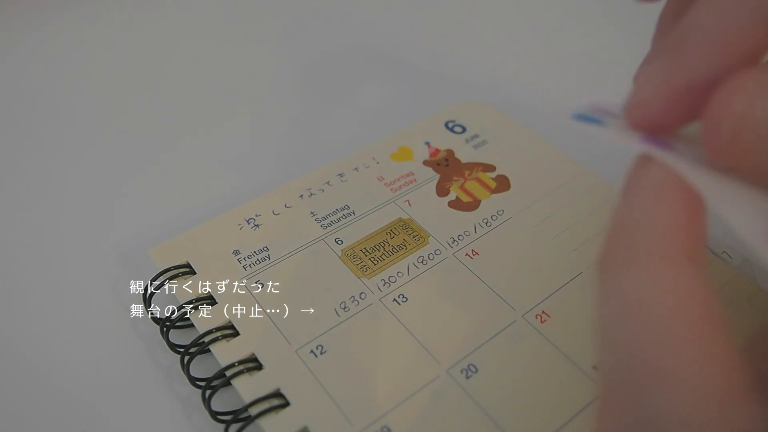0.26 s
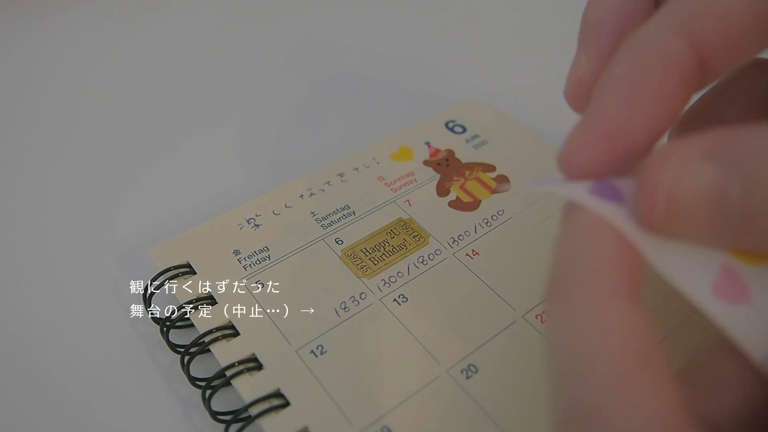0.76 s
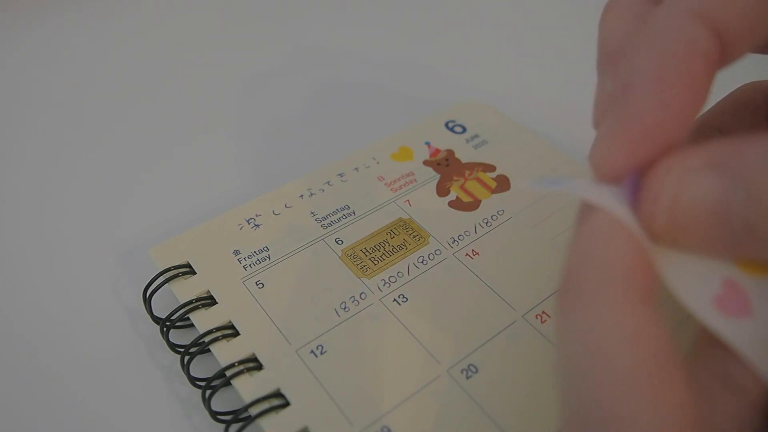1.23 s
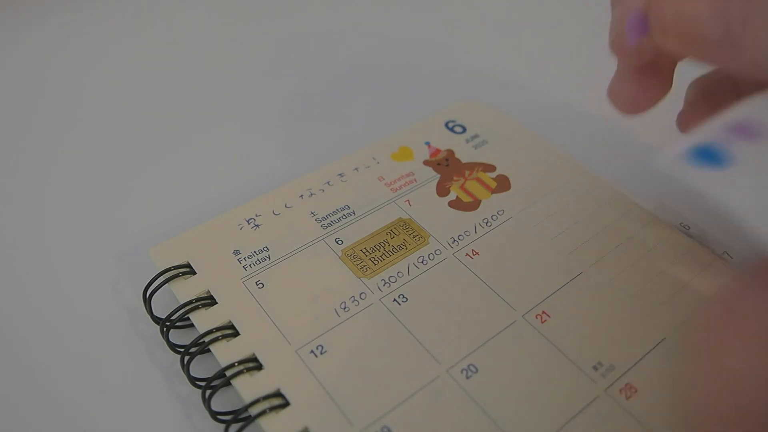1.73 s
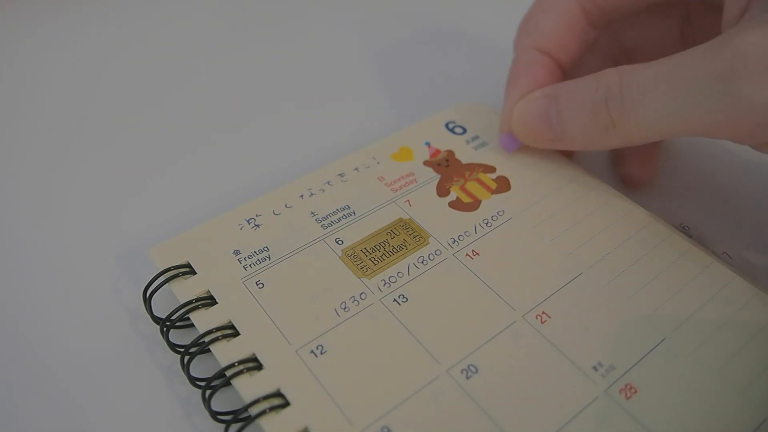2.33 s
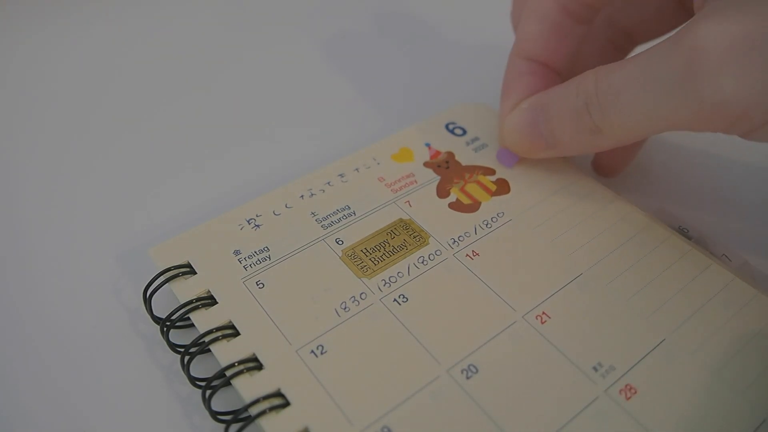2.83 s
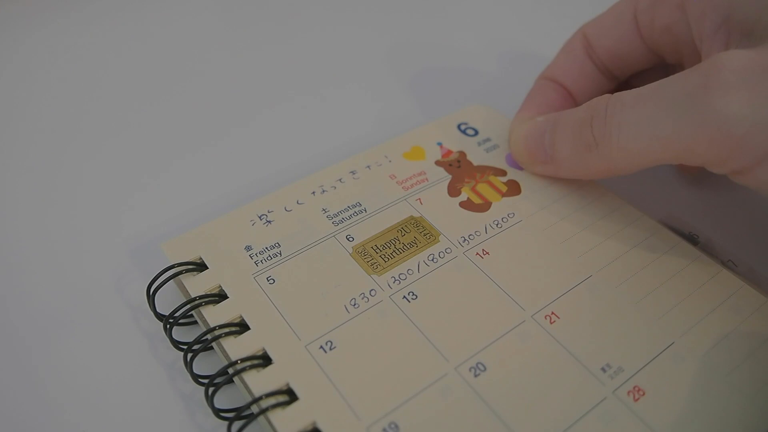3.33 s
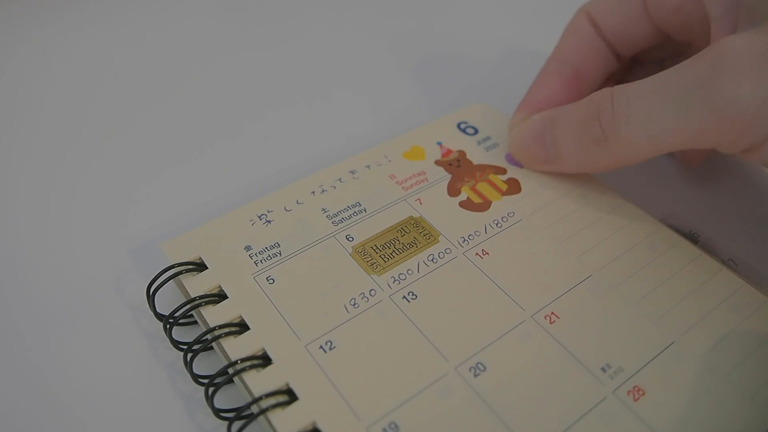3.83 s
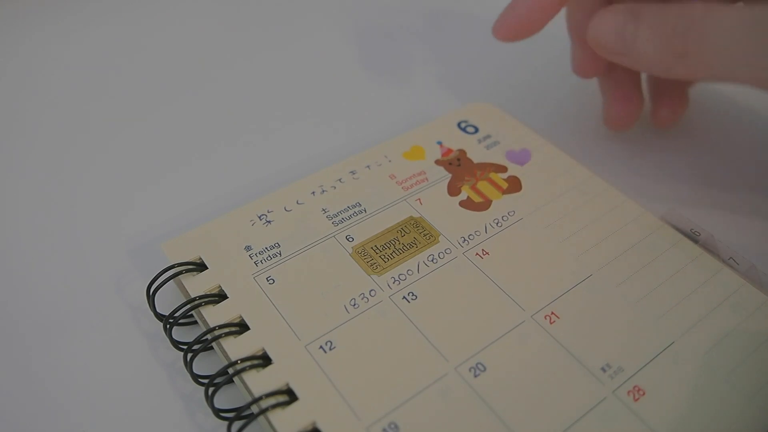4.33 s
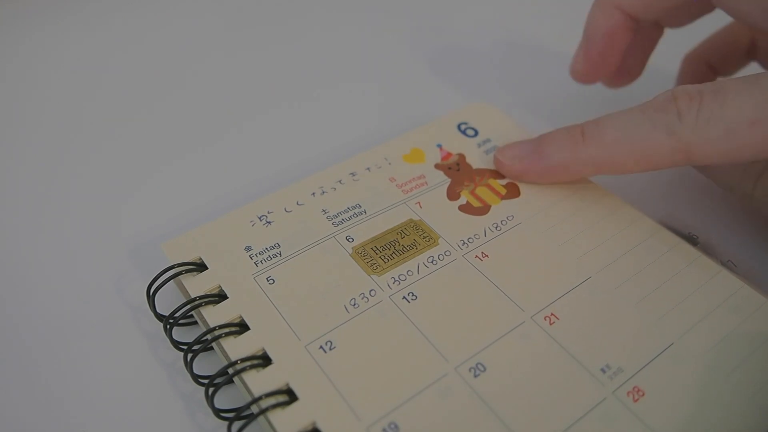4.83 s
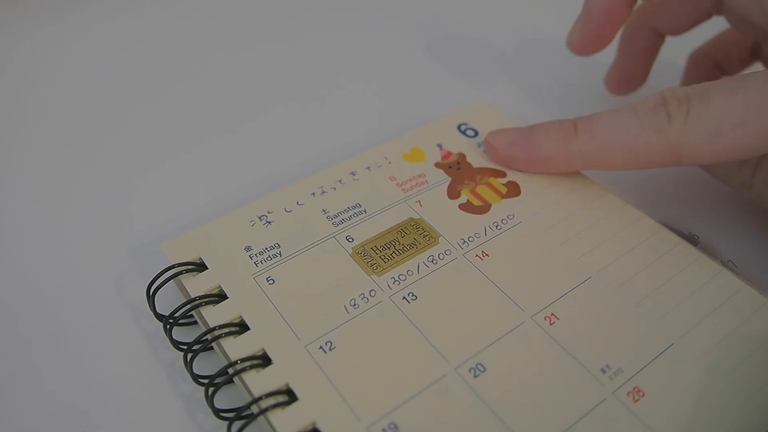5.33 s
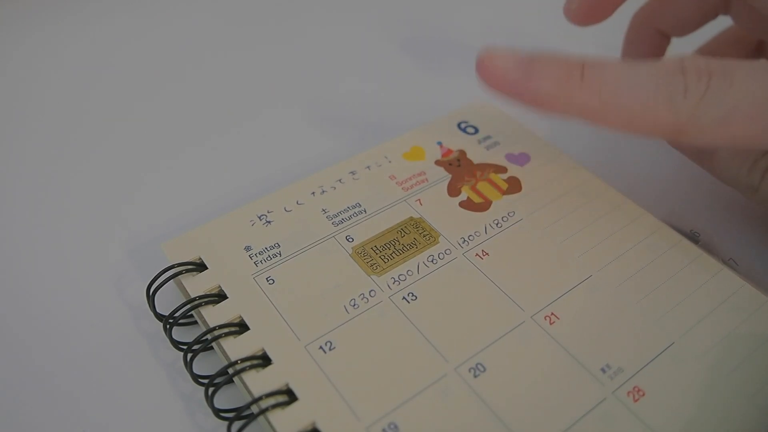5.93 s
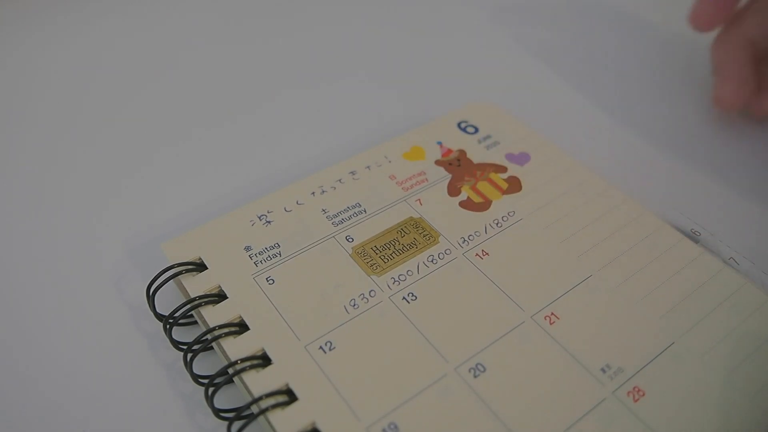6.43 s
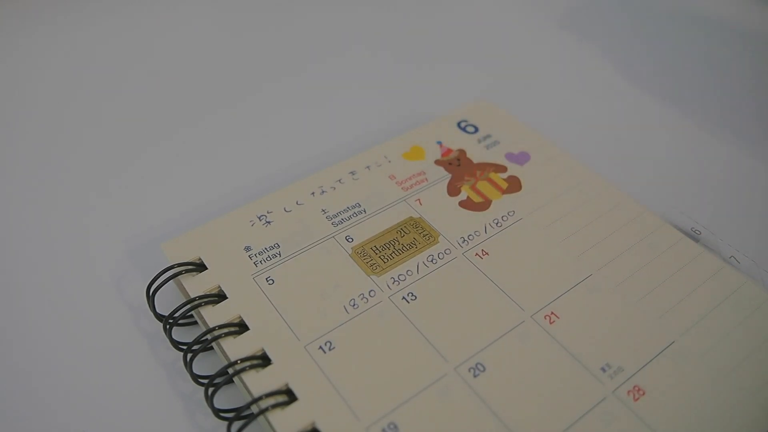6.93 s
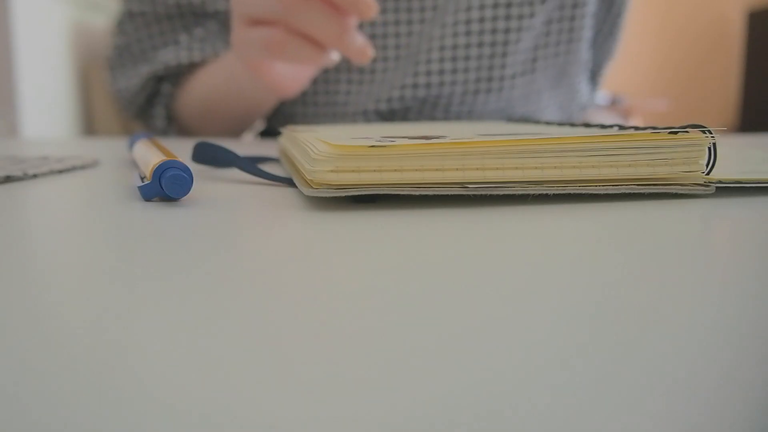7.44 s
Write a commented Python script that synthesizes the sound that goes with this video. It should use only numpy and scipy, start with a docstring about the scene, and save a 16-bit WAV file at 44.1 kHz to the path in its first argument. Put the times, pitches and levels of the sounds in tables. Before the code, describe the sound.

Steady soft room hiss with a faint wavering low hum, recorded very close in stereo, treble leaning left. From 0 to 1.4 s, a light rub and soft dull hand thumps, then small dry paper rubs. At 1.5 s the backing sheet cracks sharply, by far the loudest sound; a knock at 1.63 starts a crisp, catching, crinkling slide that thins out by 2.3. A short hollow nail tap falls at 2.57, then faint creaky fingertip presses until 3.1. Tiny sticky ticks come at 3.6 to 3.75, a thump at 4.2, quiet taps at 4.66, 5.6 and, stronger, 5.95, with dull touches and rubbing around 5.1 to 5.3. Knocks land at 6.3 to 6.4 and, with a tap, at 6.82. At 7.2 a clear tap and desk knocks start a low arm shuffle; a quick, hollow, fluttering swish peaks at 7.43.

```python
"""First a light rub and soft thumps of a hand are heard, close by, over the quiet air of a small room.
A sticker is peeled from its backing sheet: shaped noise rustles, one sharp snap cracks, the sheet slides off.
A fingertip rubs the sticker onto a planner page with creaking noise; its taps ring a few damped page modes.
Hands knock on the desk, ringing its damped modes, and something brushes by with a short, hollow swish."""
import sys
import numpy as np
from scipy import signal
from scipy.fft import rfft, irfft, next_fast_len
from scipy.io import wavfile
from scipy.ndimage import uniform_filter1d

SR = 44100
rng = np.random.default_rng(int(sys.argv[2]) if len(sys.argv) > 2 else 0)


def generate_wav(sig):
    """Save sig (samples, or channels by samples) to the path in sys.argv[1] as 16-bit PCM at SR."""
    pcm = np.round(np.clip(np.atleast_2d(sig).T, -1, 1) * 32767).astype(np.int16)
    wavfile.write(sys.argv[1], SR, pcm)


N = 338247
T = np.arange(N) / SR
RING_T = T[:8192]  # time axis of one short sound, 0.19 s


def amp(db):
    """Turn decibels into a gain."""
    return 10 ** (np.asarray(db) / 20)


def unit(x):
    """Scale to rms 1."""
    return x / np.sqrt(np.mean(x ** 2))


def along(points, hz):
    """Join (frequency [Hz], value) points on a log-frequency axis."""
    f, value = np.transpose(points)
    return np.interp(np.log(hz + 1), np.log(f), value)


def gains(points, hz):
    """Gain of a (frequency [Hz], level [dB]) spectrum that falls away beyond its ends."""
    below = np.minimum(hz / points[0][0], 1) ** 2
    above = np.minimum(points[-1][0] / (hz + 1), 1) ** 2
    return amp(along(points, hz)) * below * above


def shape(x, gain_at):
    """Filter with a gain that is given as a function of frequency."""
    size = next_fast_len(N, True)
    hz = np.arange(size // 2 + 1) * SR / size
    return irfft(rfft(x, size) * gain_at(hz), size)[..., :N]


def soften(x, hz):
    """One-pole low-pass: a softer contact passes less treble."""
    return signal.sosfilt(signal.butter(1, min(hz, SR / 2 - 1), fs=SR, output="sos"), x)


def low_cut(x, hz):
    """High-pass: a small body radiates little bass."""
    return signal.sosfilt(signal.butter(2, hz, "high", fs=SR, output="sos"), x)


def add(track, s, sound):
    """Mix a sound into a track at a time in seconds."""
    start = int(s * SR)
    track[..., start:start + sound.shape[-1]] += sound[..., :N - start]


def walk(rate):
    """A smooth random wander of rms 1, drawn anew about `rate` times a second."""
    step = max(int(SR / rate), 1)
    steps = np.repeat(rng.standard_normal(N // step + 1), step)[:N]
    return unit(uniform_filter1d(steps, step))


def stroke(s, db, rise, fall):
    """A rub speeds up to a peak at time s and slows down, as a bell-shaped level."""
    distance = (T - s) / np.where(T < s, rise, fall)
    return amp(db) * np.exp(-np.minimum(distance ** 2, 50))


def gesture(s, db, length, rise_share):
    """A stroke that spends a share of its length speeding up."""
    return stroke(s, db, length * rise_share, length * (1 - rise_share))


def ring(modes, pitch=1, scatter=0):
    """Damped modes after a blow, peak 1; scatter [dB] shifts their weights with the place of the blow."""
    y = np.zeros(len(RING_T))
    for f, db, t60 in modes:
        decay = np.exp(-np.log(1000) * RING_T / t60)
        weight = amp(db + scatter * rng.standard_normal())
        y += weight * np.sin(2 * np.pi * f * pitch * RING_T) * decay
    return y / np.abs(y).max()


# how alike left and right are for close sounds, before the lean: (frequency [Hz], correlation)
CLOSE_LIKENESS = [(700, 0.97), (2500, 0.85), (5000, 0.38), (8000, 0.066)]


def texture(colour, likeness=CLOSE_LIKENESS, grain_db=0, rate=3000):
    """Stereo hiss of tiny slips, rms 1; each grain has its own random size."""
    step = max(int(SR / rate), 1)
    grains = np.repeat(rng.exponential(size=N // step + 1), step)[:N]
    sizes = amp(grain_db * np.minimum(grains, 5))
    mid, side = rng.standard_normal((2, N)) * sizes

    def alike(hz):
        return np.clip(along(likeness, hz), -1, 1)

    mid = shape(mid, lambda hz: gains(colour, hz) * np.sqrt(1 + alike(hz)))
    side = shape(side, lambda hz: gains(colour, hz) * np.sqrt(1 - alike(hz)))
    return unit(np.array([mid + side, mid - side]))


def sheet(x, depth_db=2.5, spacing_hz=110):
    """The many bending modes of a sheet ripple the spectrum of whatever rubs it."""
    grid = np.arange(0, SR / 2, spacing_hz)
    ripple = rng.standard_normal(len(grid))
    return unit(shape(x, lambda hz: amp(depth_db * np.interp(hz, grid, ripple))))


# full lean of the treble: (frequency [Hz], left minus right [dB])
LEFT_LEAD = [(1500, 0), (2500, 1), (4400, 4.5), (8000, 8.5), (15000, 14)]


def lean_left(x, share=1):
    """The treble is stronger on the left."""
    sides = np.array([[1], [-1]]) / 2
    return shape(x, lambda hz: amp(share * along(LEFT_LEAD, hz) * sides))


def desk_dip(x, dip_hz=405, width_hz=130, depth=0.49):
    """Sound bounced off the desk partly cancels the direct sound in one low band."""
    band = signal.lfilter(*signal.iirpeak(dip_hz, dip_hz / width_hz, fs=SR), x)
    return x - depth * band


def room(x, damp_hz=7000, gap_s=0.0014):
    """Things on the desk scatter the sound at once; the walls return a faint, dull tail, cut at 0.19 s."""
    out = x
    for db, t60 in ((-16, 0.13), (-22, 0.45)):  # desk, then walls: (level [dB], decay rate as t60 [s])
        shared = rng.standard_normal(len(RING_T))
        own = rng.standard_normal((2, len(RING_T)))  # separate for left and right
        tail = soften(shared + 0.51 * own, damp_hz)
        tail = tail * np.exp(-np.log(1000) * RING_T / t60) * (RING_T > gap_s)
        tail = tail / np.sqrt(np.sum(tail ** 2) / 2)
        out = out + amp(db) * signal.fftconvolve(x, tail, axes=1)[:, :N]
    return out


# colour of the room hiss: (frequency [Hz], relative level [dB])
AIR_COLOUR = [(15, -44), (25, -15.5), (69, -3), (113, -2), (144, -6.5), (178, -0.5), (209, -1), (305, -5.5),
              (445, -8.5), (552, -7), (997, -8), (1570, -10.5), (1900, -10.5), (3000, -12.5),
              (15500, -19.5)]
# how alike left and right are in the hiss, before the lean: (frequency [Hz], correlation)
AIR_LIKENESS = [(60, 0.63), (150, 0.46), (300, 0.26), (1000, 0.16), (15000, 0.16)]


def air(hum_hz=141, hum_db=-64, hiss_db=-47.5):
    """Room air and microphone hiss, with the wavering hum of an appliance."""
    phase = 2 * np.pi * np.cumsum(hum_hz + 4 * walk(20)) / SR
    hum = np.sqrt(2) * np.sin(phase) * amp(hum_db + 2.9 * walk(6.7))
    hiss = texture(AIR_COLOUR, AIR_LIKENESS) * amp(hiss_db)  # level before the resonances
    # faint fixed resonances colour the hiss: (frequency [Hz], width [Hz], level [dB])
    peaks = [(401, 90, -6), (1594, 210, 5.0), (3134, 300, 5.0), (6300, 1250, 4.5)]

    def resonances(hz):
        return amp(sum(db / (1 + (2 * (hz - f) / width) ** 2) for f, width, db in peaks))

    return lean_left(shape(hiss, resonances), share=0.33) + hum


# colour of the arms on the desk: (frequency [Hz], relative level [dB])
SHUFFLE_COLOUR = [(70, -10), (130, -0.5), (240, 2), (400, -5.5), (650, -8), (1500, -16), (3000, -20),
                  (8000, -32)]


def shuffle(start_s=7.19, attack_s=0.056, level_db=-47.5):
    """The low shuffle of arms on the desk sets in and holds, as coarse-grained noise."""
    onset = np.clip((T - start_s) / attack_s, 0, 1)
    return amp(level_db) * onset * texture(SHUFFLE_COLOUR, grain_db=1.0, rate=280)


# modes of the planner lying on the desk: (frequency [Hz], relative level [dB], t60 [s])
PLANNER_MODES = [(82.5, -8, 0.054), (144, 4.5, 0.13), (185, 5.5, 0.045), (240, 0, 0.059)]


def thud(push_ms):
    """Flesh pushes slowly, so mostly the lowest modes of the planner answer; peak 1."""
    push = np.sin(np.pi * np.minimum(1000 * RING_T / push_ms, 1)) ** 2
    y = signal.fftconvolve(ring(PLANNER_MODES), push)
    return y / np.abs(y).max()


PAD_LAG_S, PAD_PUSH_MS = 0.0051, 5.1
# the side of a hand lands on the planner: (time [s], level before LANDING [dB])
THUMPS = [(0.058, -34), (.134, -25.5), (.643, -43), (1.769, -37), (2.026, -27.5), (4.188, -33.5),
          (6.372, -37), (7.453, -41)]
# a hand goes from light touch to full weight to settling:
# (time from full weight [s], added level [dB], push [ms])
LANDING = [(-.02, -9, 6), (0, -0.5, 2.7), (.022, -7, 2.6)]


def thumps():
    """A hand rolls onto the planner in three pushes; a finger pad lands just after each nail tap."""
    out = np.zeros(N)
    for s, db in THUMPS:
        for lag, share_db, push_ms in LANDING:
            start = s + lag - push_ms / 2000  # the middle of the push falls on time
            add(out, start, amp(db + share_db) * thud(push_ms))
    for s, *_, pad_db in TAPS:
        add(out, s + PAD_LAG_S, amp(pad_db) * thud(PAD_PUSH_MS))
    return out


# the scuff's gain, its decay at a brightness of 1 kHz, and the power by which duller blows scuff longer
SCUFF_GAIN, SCUFF_DECAY_MS, SCUFF_SOFTNESS = 0.354, 16.5, 0.51
# colour of the scuff: (frequency [Hz], relative level [dB])
SCUFF_COLOUR = [(160, 3.5), (300, 8.5), (420, -3.5), (620, 3), (1100, 5.5), (2000, 0.5), (3200, -4),
                (6000, -26), (15000, -20)]
# modes of the desk top: (frequency [Hz], relative level [dB], t60 [s])
DESK_MODES = [(179, -17, 0.034), (266, -7.5, 0.035), (324, -7.5, 0.043), (530, -9, 0.036), (693, -5, 0.042),
              (957, -1.5, 0.021), (1390, -2, 0.0088), (1970, 0, 0.0075), (2500, -7, .01), (3140, 3, 0.017)]
# knocks on the desk: (time [s], peak level [dB], brightness as a low-pass corner [Hz])
KNOCKS = [(0.642, -35, 1090), (1.632, -22, 6000), (1.645, -34, 4000), (5.128, -35.5, 800),
          (5.148, -34, 650), (6.319, -27.5, 3000), (6.389, -20, 1700), (6.406, -32, 800),
          (6.82, -27.5, 1310), (7.1948, -28, 2000), (7.205, -24, 400)]


def knocks(cut_hz=140, thin_power=0.62):
    """Each blow rings and scuffs the desk top; a soft one is dull and scuffs longer, a hard one is thin."""
    out = np.zeros(N)
    grain = unit(shape(rng.standard_normal(N), lambda hz: gains(SCUFF_COLOUR, hz)))
    for s, db, bright_hz in KNOCKS:
        scuff_ms = SCUFF_DECAY_MS * (1000 / bright_hz) ** SCUFF_SOFTNESS
        scuff = np.roll(grain, -int(s * SR))[:len(RING_T)] * np.exp(-1000 * RING_T / scuff_ms)
        blow = ring(DESK_MODES, scatter=1) + SCUFF_GAIN * scuff
        blow = soften(soften(blow, bright_hz), bright_hz)
        blow = low_cut(blow, cut_hz * (bright_hz / 1000) ** thin_power)  # cut_hz holds at 1 kHz
        add(out, s, amp(db) * blow / np.abs(blow).max())
    return out


SWISH_S, SWISH_RISE_S, SWISH_FALL_S = 7.43, 0.031, 0.027
SWISH_BODY_DB, SWISH_FULL_SHARE = -32.5, 0.26  # the body levels off above this share of the top speed
SWISH_HISS_DB, SWISH_HISS_POWER = -29.5, 1.45  # the hiss grows as this power of the speed
# hollow resonance of the swish: (frequency [Hz], relative level [dB])
SWISH_BODY = [(450, -10), (780, -12.5), (1020, -7), (1400, -12.5), (1590, -2), (1760, -4), (1970, -0.5),
              (2250, 0), (2500, -17), (4000, -13.5)]
# hiss of the swish: (frequency [Hz], relative level [dB])
SWISH_HISS = [(1500, -21), (3500, 4), (4600, -2), (6400, 1), (8000, -4), (9800, -0.5), (15000, -9)]


def swish(follow_db=-18, follow_s=0.097, flutter_db=2.5):
    """A quick hollow swish that flutters, brightest at its fastest, with a slow follow-through."""
    quick = stroke(SWISH_S, 0, SWISH_RISE_S, SWISH_FALL_S)
    speed = np.maximum(quick, stroke(SWISH_S, follow_db, follow_s, follow_s))
    body_level = amp(SWISH_BODY_DB) * np.tanh((speed / SWISH_FULL_SHARE) ** 2)
    hiss_level = amp(SWISH_HISS_DB) * speed ** SWISH_HISS_POWER
    body = body_level * texture(SWISH_BODY)
    hiss = hiss_level * sheet(texture(SWISH_HISS, grain_db=-1.5))
    return (body + hiss) * amp(flutter_db * walk(140))


RUB_RISE_SHARE = 0.34  # of a rub's length
# colour of fingers on paper: (frequency [Hz], relative level [dB])
RUB_COLOUR = [(250, -25), (420, -6), (650, -2), (1300, 3.5), (2200, 1.5), (3000, 4.5), (4200, -5.5),
              (6600, -0.5), (8800, -11), (15000, -17)]
# short rubs of fingers and paper:
# (time of the peak [s], level [dB], length [s], brightness as the added level per higher band [dB])
RUBS = [(.01, -46.5, 0.085, -1), (0.159, -50, 0.19, 4), (0.286, -39.5, 0.046, 3.5),
        (0.382, -47.5, 0.064, 3), (.49, -53.5, .3, 5), (.75, -46.5, 0.098, 4), (0.867, -52.5, 0.14, 2.5),
        (1.044, -47.5, 0.17, 4), (1.359, -47, .06, 3), (1.394, -46, 0.038, 4.5), (1.607, -40.5, 0.17, 0.5),
        (2.177, -48, .05, -9), (2.27, -47.5, 0.024, 5), (3.65, -48, 0.076, -6), (4.202, -53, 0.059, 7.5),
        (4.724, -48.5, 0.13, 0.5), (5.037, -47, 0.036, -6), (5.145, -48, .075, -9), (5.3, -57, 0.12, -11),
        (6.318, -48, 0.14, -1.5), (6.453, -46.5, 0.13, -10), (6.535, -49, 0.042, 2),
        (6.763, -48.5, 0.17, 2.5), (7.057, -53, 0.16, 4.5), (7.333, -52, .11, -2), (7.465, -48, .06, 5)]


def rubs(low_hz=3500, high_hz=8000, catch_db=2.0):
    """Fingers work the sticker loose and brush the page: unsteady noise in three bands, tilted per rub."""
    grain = sheet(texture(RUB_COLOUR, grain_db=2.5)) * amp(catch_db * walk(90))
    low = shape(grain, lambda hz: 1 / (1 + (hz / low_hz) ** 6))
    below_top = shape(grain, lambda hz: 1 / (1 + (hz / high_hz) ** 6))
    bands = (low, below_top - low, grain - below_top)
    levels = np.zeros((3, N))
    for s, db, length, bright_db in RUBS:
        level = gesture(s, db, length, RUB_RISE_SHARE)
        for k in range(3):
            levels[k] += level * amp(k * bright_db)
    return sum(band * level for band, level in zip(bands, levels))


PRESS_RISE_SHARE = 0.47  # of a press's length
# colour of the creak: (frequency [Hz], relative level [dB])
PRESS_COLOUR = [(300, -22), (520, -4), (780, 2.5), (950, -4), (1200, -15), (3000, -17)]
# colour of the rumble: (frequency [Hz], relative level [dB])
RUMBLE_COLOUR = [(35, -6), (55, 4), (90, -4.5), (150, 6), (230, -5.5), (380, -25)]
# the fingertip smooths the sticker down:
# (time of the peak [s], creak level [dB], rumble level [dB], length [s])
PRESSES = [(2.48, -58, -52.5, 0.16), (2.833, -52.5, -49.5, 0.095), (2.953, -52, -64, .08),
           (3.052, -51.5, -60, .1), (5.16, -59, -50, .06), (5.283, -53.5, -68, 0.23),
           (6.218, -51.5, -57, .09)]


def presses():
    """Skin creeps over the sticker, stirring the page stack (creak) and rocking the planner (rumble)."""
    creak = texture(PRESS_COLOUR, grain_db=2, rate=600)
    rumble = texture(RUMBLE_COLOUR)
    out = np.zeros((2, N))
    for s, creak_db, rumble_db, length in PRESSES:
        press = amp(creak_db) * creak + amp(rumble_db) * rumble
        out += press * gesture(s, 0, length, PRESS_RISE_SHARE)
    return out


def tick(decay_ms, top_hz=4600, width=1.04):
    """A very short burst of paper noise, partly different on each side."""
    shared = rng.standard_normal(len(RING_T))
    own = rng.standard_normal((2, len(RING_T)))
    burst = unit(soften(shared + width * own, top_hz))
    return burst * np.exp(-1000 * RING_T / decay_ms)


UNSTICK_DECAY_MS = 5.7
# the sticky paper lets go: (time [s], level [dB])
UNSTICKS = [(3.618, -41), (3.655, -47), (3.734, -35.5), (3.740, -34.5), (7.120, -38)]


def unsticks(ring_db=-12, ring_hz=880):
    """Glue lets go with a tick that barely stirs the page stack."""
    out = np.zeros((2, N))
    for s, db in UNSTICKS:
        pop = tick(UNSTICK_DECAY_MS) + amp(ring_db) * ring(PAGE_MODES, ring_hz)
        add(out, s, amp(db) * pop)
    return out


TICK_DECAY_MS = 1.67
# modes of the page stack under a nail: (multiple of the ring pitch, relative level [dB], t60 [s])
PAGE_MODES = [(1, 14, 0.017), (.84, -28, 0.029), (1.9, -2, 0.028), (2.8, 0, 0.0068), (3.9, -14, 0.016)]
# a fingernail meets the page and the pad of the finger follows:
# (time [s], ring level [dB], ring pitch [Hz], tick level [dB], pad level [dB])
TAPS = [(2.570, -25, 786, -25.5, -49), (4.660, -37.5, 806, -37.5, -35.5), (5.600, -28, 810, -37, -38),
        (5.949, -23, 800, -32.5, -26.5), (6.817, -29.5, 836, -40, -34), (7.1942, -17.5, 857, -36.5, -52),
        (7.2128, -31, 785, -52, -48)]


def taps():
    """The nail ticks on the paper and the page stack rings briefly."""
    out = np.zeros((2, N))
    for s, ring_db, hz, tick_db, _ in TAPS:
        nail = amp(ring_db) * ring(PAGE_MODES, hz) + amp(tick_db) * tick(TICK_DECAY_MS)
        add(out, s, nail)
    return out


def crinkle(rate=130, spread_db=3):
    """Sparse little creases that pop in the bending sheet, about `rate` a second."""
    sizes = amp(spread_db * np.minimum(rng.exponential(size=N), 3))
    pops = (rng.random(N) < rate / SR) * sizes
    return sheet(shape(pops, lambda hz: gains(RUB_COLOUR, hz)))


CATCH_RISE_S, CATCH_FALL_S = 0.004, 0.01
EDGE_DB, EDGE_FULL_SHARE = -42.5, 0.56  # the edge hiss levels off above this share of the top speed
# the body grows as a power of the speed and fades as less paper stays in contact
BODY_DB, BODY_POWER, BODY_FADE_DB_PER_S = -39, 0.35, 7.5
# how fast the sheet is drawn over the page, as its hiss before a trim: (time [s], level [dB])
SLIDE = [(1.645, -41.5), (1.673, -44), (1.677, -41), (1.725, -31), (1.925, -44), (1.989, -38.5),
         (2.053, -45.5), (2.213, -43.5), (2.247, -49), (2.285, -44), (2.32, -64)]
# the sheet catches as it starts to move: (time of the peak [s], level [dB])
CATCHES = [(1.606, -36), (1.628, -33), (1.682, -33.5), (1.708, -38), (1.729, -42)]
# colour of the hiss: (frequency [Hz], relative level [dB])
SLIDE_HISS = [(2800, -29), (4200, -4.5), (4900, 2.5), (6600, 1.5), (8500, -0.5), (10000, -5.5),
              (12500, -20)]
# finer hiss of the cut edge: (frequency [Hz], relative level [dB])
SLIDE_EDGE = [(7500, -18), (10000, 1.5), (13000, 1), (15500, -9)]
# fuller sound of the sheet's body: (frequency [Hz], relative level [dB])
SLIDE_BODY = [(150, -1), (400, -23), (700, -2), (1150, 2), (2000, -5), (3300, -4.5), (5000, -7.5)]


def slide(hiss_trim_db=-1.5, catch_db=1.25, crinkle_db=-8):
    """Paper drags over paper, catching and crinkling; its speed drives the hiss, edge and body noise."""
    s, db = np.transpose(SLIDE)
    drag = amp(np.interp(T, s, db)) * (T > s[0]) * (T < s[-1])
    speed = drag / drag.max()
    catches = sum(stroke(at, size_db, CATCH_RISE_S, CATCH_FALL_S) for at, size_db in CATCHES)
    hiss_level = np.hypot(drag * amp(hiss_trim_db), catches)
    edge_level = np.tanh(speed / EDGE_FULL_SHARE) * amp(EDGE_DB)
    body_level = speed ** BODY_POWER * amp(BODY_DB - BODY_FADE_DB_PER_S * (T - s[0]))
    rustle = sheet(texture(SLIDE_HISS, grain_db=2.5, rate=4000))
    hiss = hiss_level * (rustle + amp(crinkle_db) * crinkle())
    edge = edge_level * sheet(texture(SLIDE_EDGE, grain_db=1.5, rate=4800))
    body = body_level * sheet(texture(SLIDE_BODY, grain_db=1.5, rate=2400))
    return (hiss + edge + body) * amp(catch_db * walk(110))


# colour of the crack: (frequency [Hz], relative level [dB])
SNAP_COLOUR = [(200, -52), (450, -29), (900, -10), (1500, -1.5), (2100, 2), (2650, 1), (3300, -14),
               (3800, -8.5), (4400, -8.5), (5500, -18), (7500, -28.5), (15000, -38)]
# the backing sheet buckles: (time [s], peak level of the crack before the desk and room [dB])
SNAPS = [(1.493, -0.5), (1.4951, -13), (1.503, -17), (1.6326, -17)]


def snap():
    """The stiff sheet flips over with a sharp crack; weaker copies follow."""
    size = 1024
    spectrum = gains(SNAP_COLOUR, np.arange(size // 2 + 1) * SR / size)
    # minimum phase: the pulse with this spectrum that starts as abruptly as possible
    cepstrum = irfft(np.log(spectrum + 1e-4))
    causal = 2 * cepstrum[:size // 2] * (np.arange(size // 2) > 0)
    crack = irfft(np.exp(rfft(causal, size)))
    out = np.zeros(N)
    for s, db in SNAPS:
        add(out, s, amp(db) * crack / np.abs(crack).max())
    return out


SNAP_ROOM_DB = -1.5  # the snap is nearest to the microphone, so it stirs the room less


def scene():
    """Everything on the desk sounds into the room, over its quiet air."""
    crack = desk_dip(snap())
    blows = low_cut(taps() + unsticks(), hz=390) + low_cut(thumps(), hz=55.4) + knocks()
    friction = rubs() + slide() + presses() + swish() + shuffle()
    send = amp(SNAP_ROOM_DB)
    in_room = room(desk_dip(blows + friction) + send * crack)
    direct = (1 - send) * crack  # the rest of the snap skips the room
    return lean_left(in_room + direct) + air()


def record(dry, top_hz=15900):
    """The input clips at full scale, then a steep low-pass cuts the top."""
    steep = signal.ellip(10, 0.1, 70, top_hz, fs=SR, output="sos")
    return signal.sosfilt(steep, np.clip(dry, -1, 1))


dry = scene()
out = record(dry)
generate_wav(out)
```